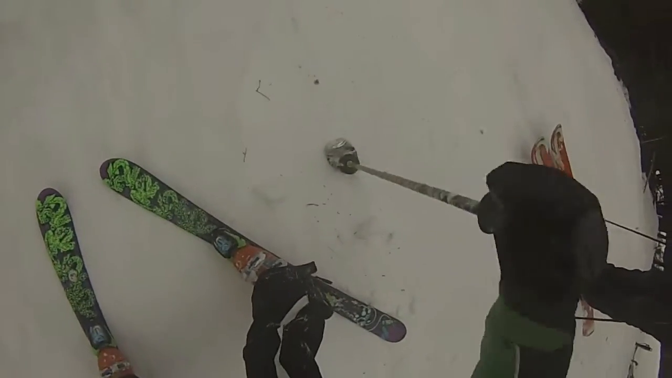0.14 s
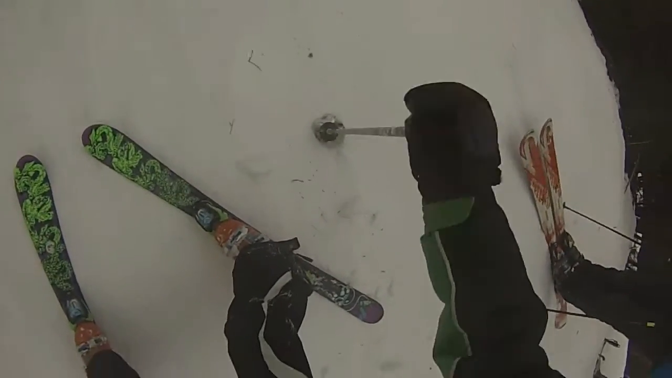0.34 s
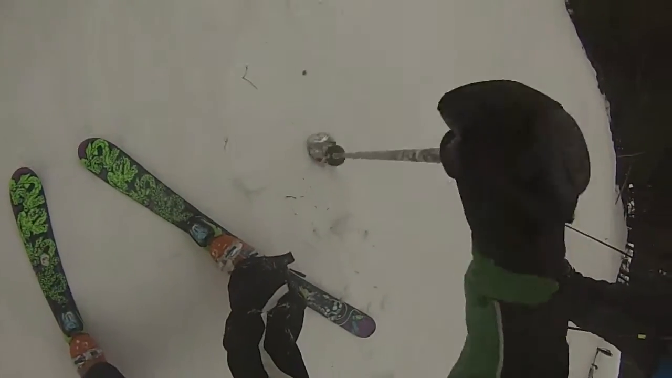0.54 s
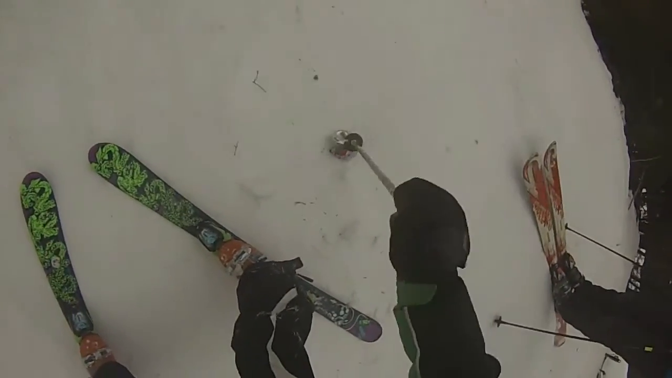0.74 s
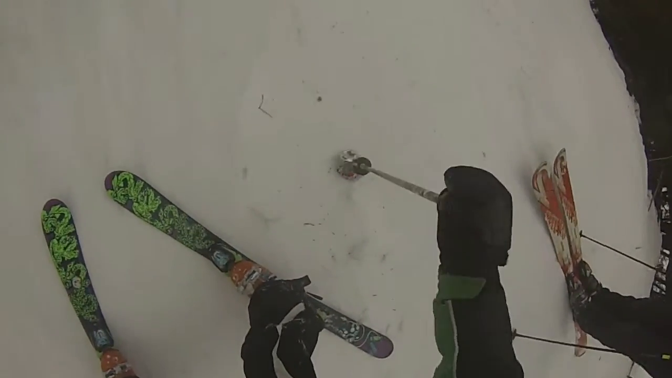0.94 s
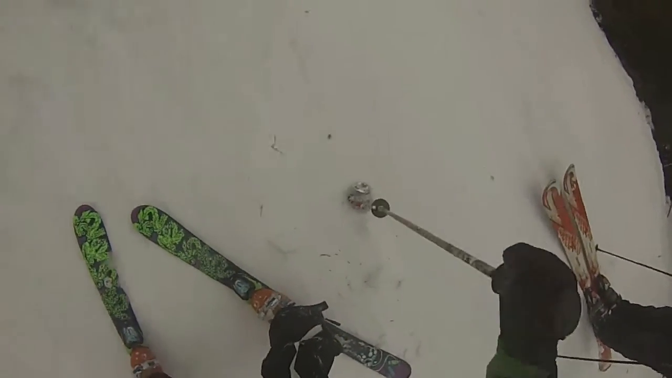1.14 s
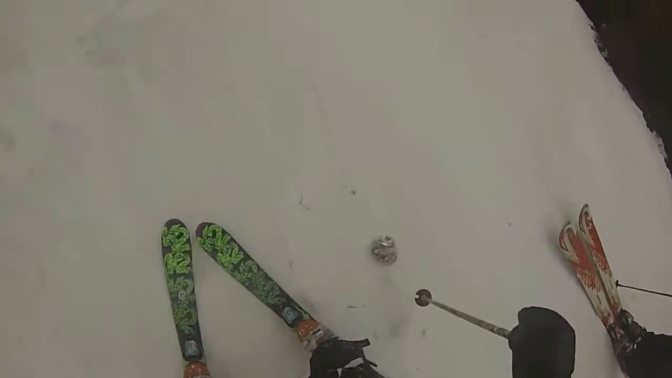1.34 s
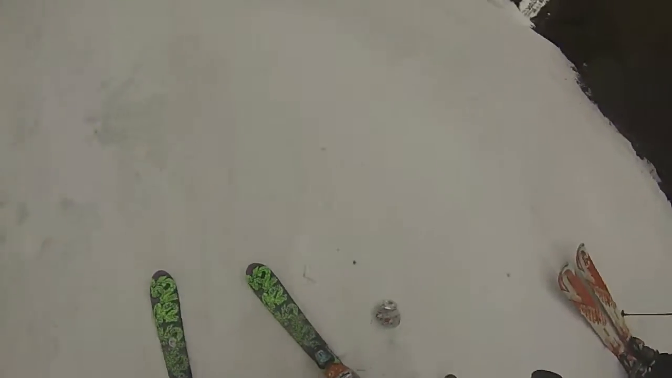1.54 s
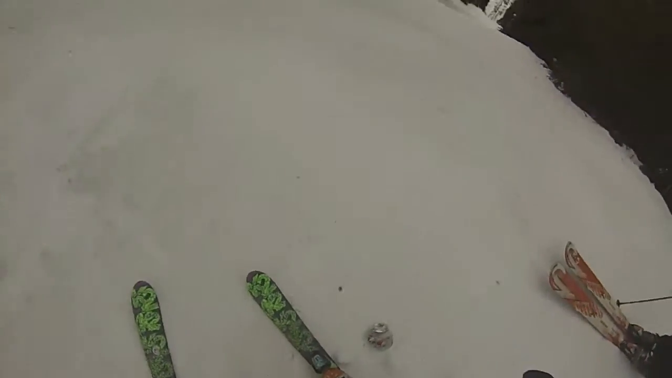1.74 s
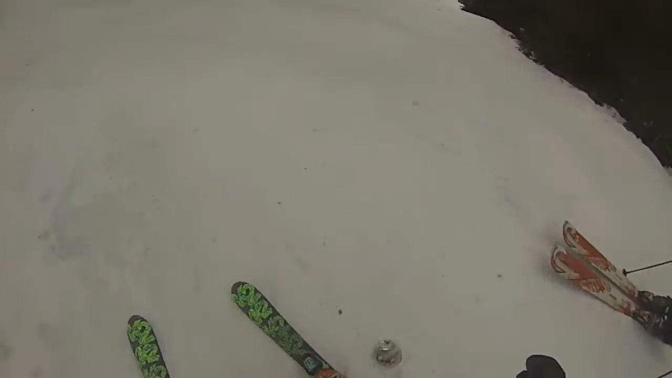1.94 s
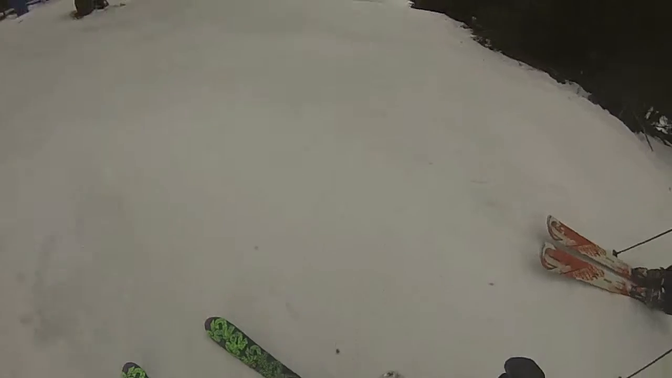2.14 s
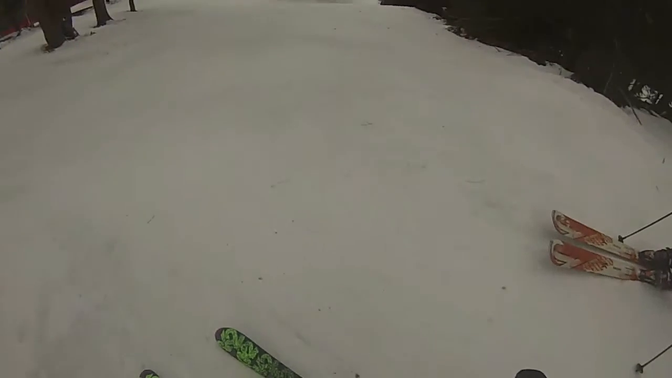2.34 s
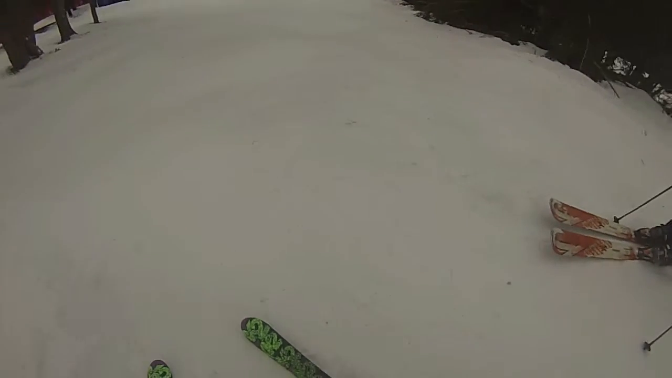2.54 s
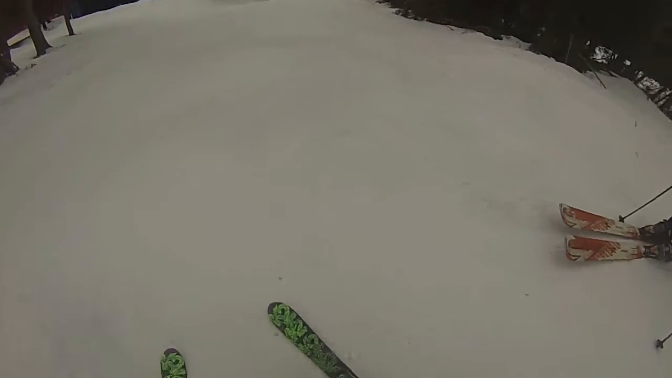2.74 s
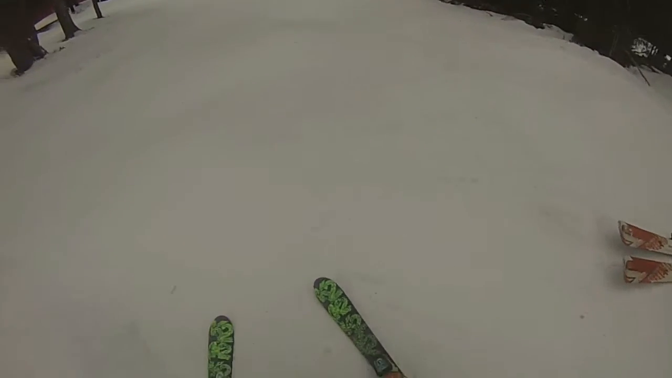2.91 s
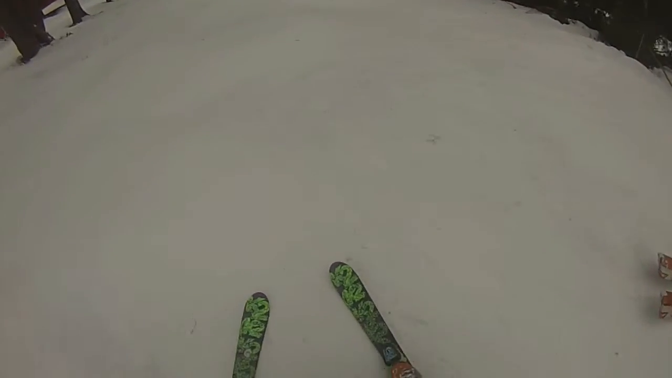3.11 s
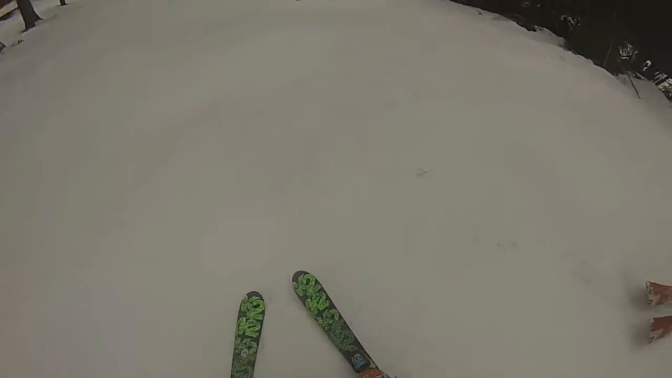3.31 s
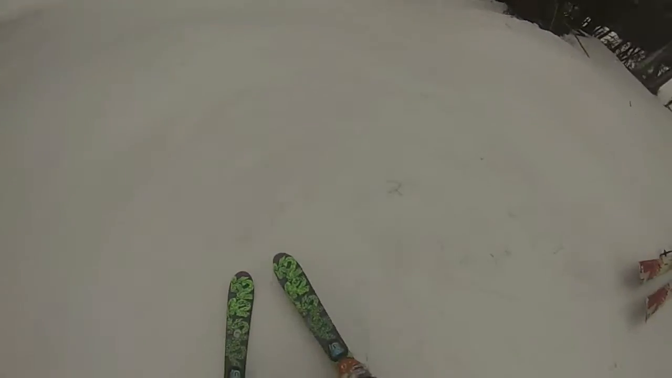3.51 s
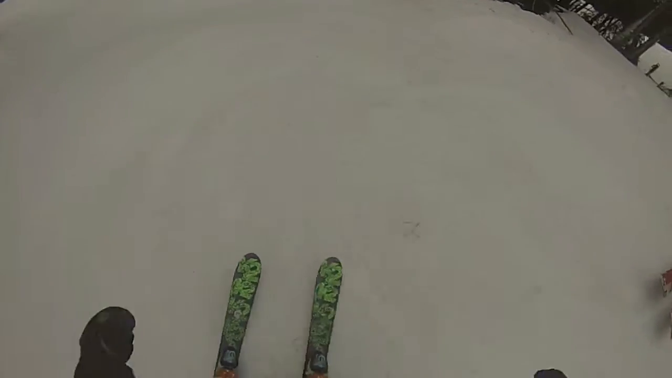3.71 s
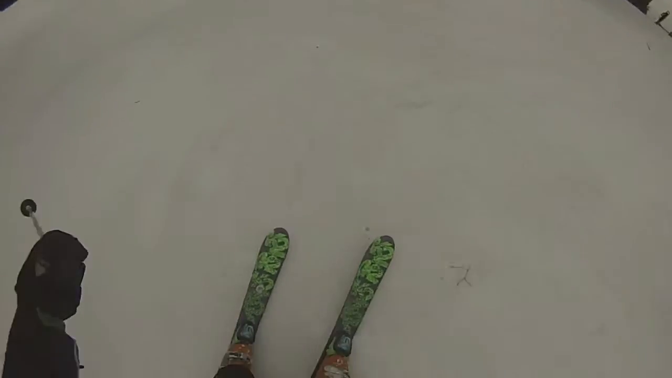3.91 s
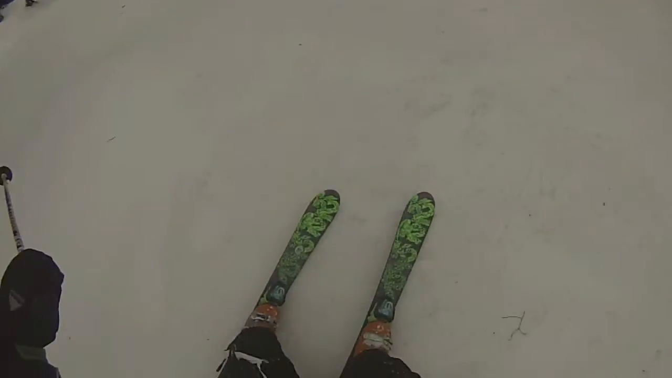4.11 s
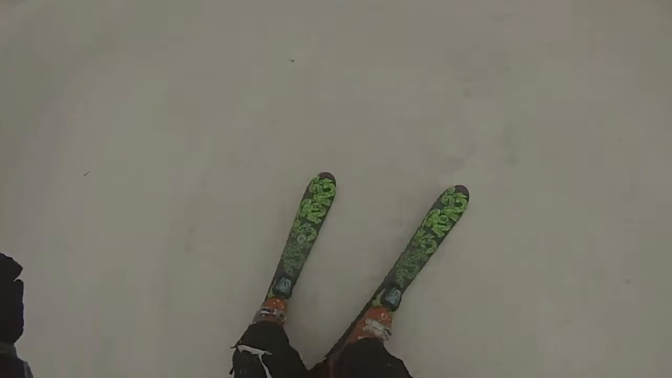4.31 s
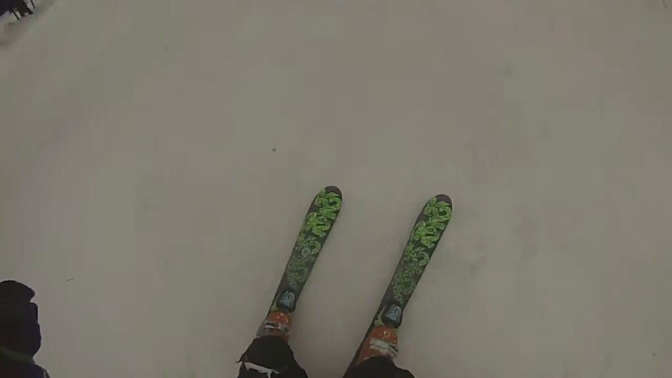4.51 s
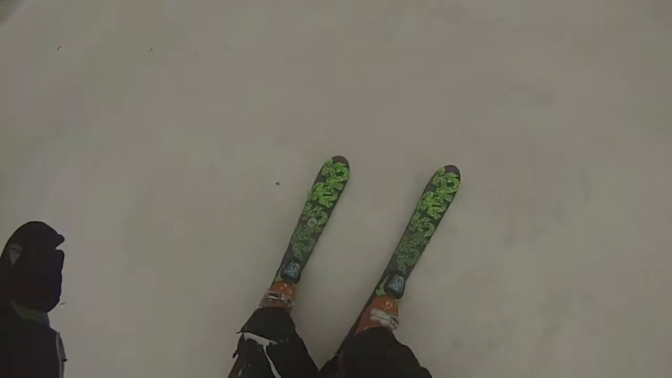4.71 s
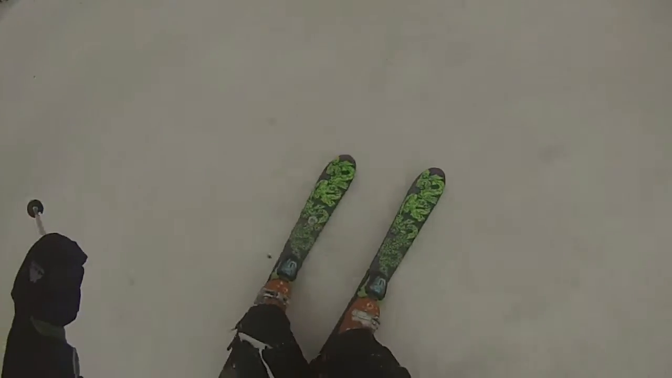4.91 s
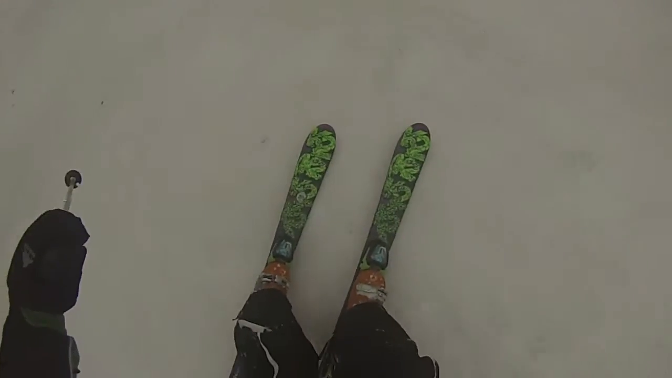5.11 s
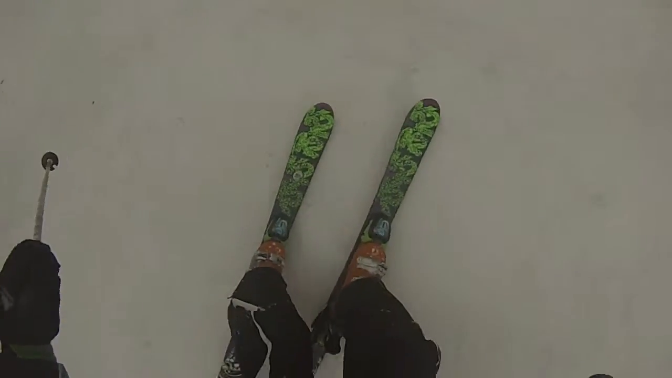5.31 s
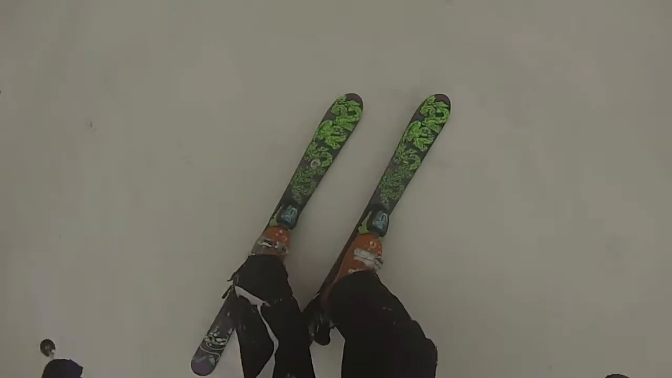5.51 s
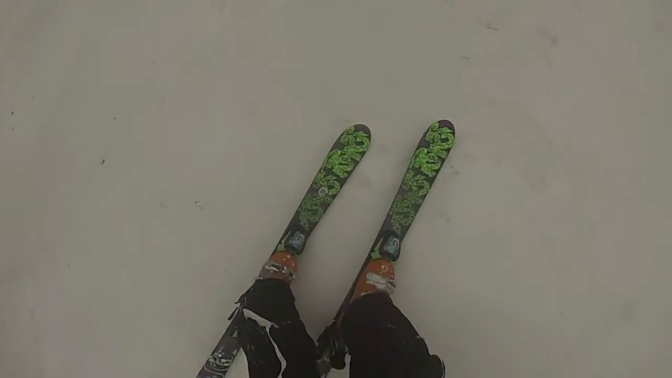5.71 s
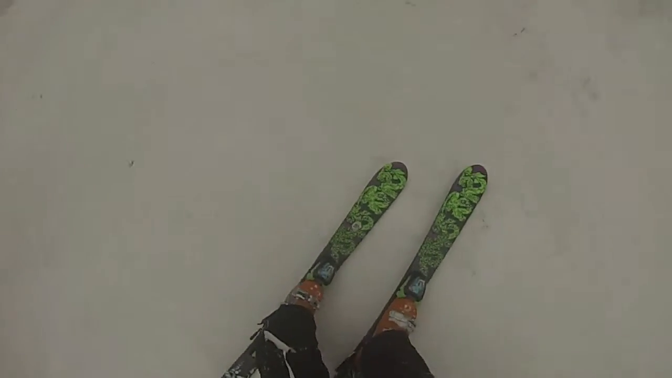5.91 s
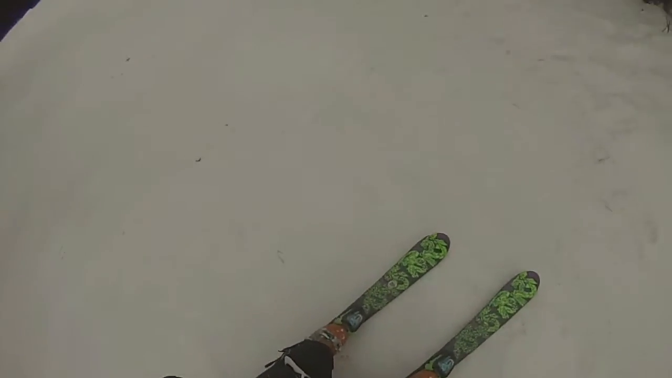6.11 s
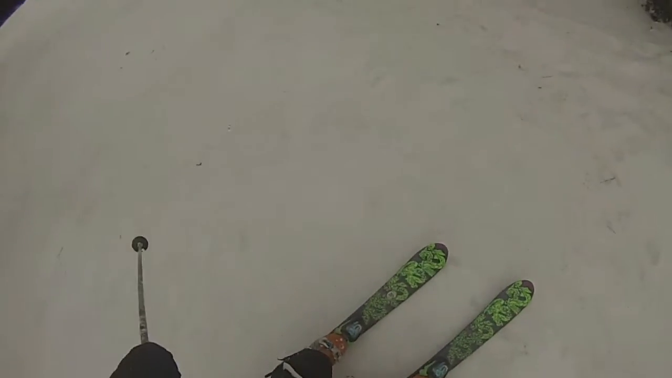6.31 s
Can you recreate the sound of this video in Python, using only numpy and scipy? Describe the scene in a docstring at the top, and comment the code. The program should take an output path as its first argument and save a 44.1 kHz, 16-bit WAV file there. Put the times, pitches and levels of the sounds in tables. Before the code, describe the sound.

A skier shuffles on crackling crust, then slides away, skis rasping and hissing over gritty ice, with dull knocks and deep wind buffeting.

```python
"""On a slope of hard icy snow a skier shuffles, then slides; the microphone rides in a sealed case on the helmet.
Breaking ice grains ring the case's resonances, and crust cracks under poles and edges as snaps with a crush.
The mount thumps on jolts as decaying sines, and pole jabs swing the case once.
Head motion and wind press on the case as deep shaped noise; a faint hoot and a steady noise floor lie behind."""
import sys
import numpy as np
from scipy import signal
from scipy.fft import rfft, irfft, next_fast_len
from scipy.io import wavfile
from scipy.ndimage import uniform_filter1d

SR = 44100
rng = np.random.default_rng(int(sys.argv[2]) if len(sys.argv) > 2 else 0)


def dump(signal):
    """Clip the signal to [-1, 1] and save it as 16-bit WAV at the path in sys.argv[1]."""
    limited = np.clip(np.atleast_2d(signal).T, -1, 1)
    pcm = np.round(limited * 32767).astype(np.int16)
    wavfile.write(sys.argv[1], SR, pcm)


N = 280035
T = np.arange(N) / SR  # seconds
SIZE = next_fast_len(N + SR // 2)  # transform length, with room for filter tails
HZ = np.arange(SIZE // 2 + 1) * SR / SIZE


def undb(db):
    """Amplitude factor of a level in dB."""
    return 10 ** (np.asarray(db) / 20)


def unit(x):
    """Scale to rms 1."""
    return x / np.sqrt(np.mean(x ** 2))


def columns(table):
    """Curve columns joined by straight lines in time."""
    seconds, *values = np.transpose(table)
    return [np.interp(T, seconds, value) for value in values]


def walk(rate):
    """Random levels held for 1 / rate seconds and slewed from one to the next; rms 1."""
    hold = max(int(SR / rate), 2)
    levels = rng.standard_normal(N // 2 + 1)[:N // hold + 1]
    steps = np.repeat(levels, hold)[:N]
    return unit(uniform_filter1d(steps, hold // 2 + 1))


def coloured(points):
    """Steady noise of rms 1 whose spectrum joins the (Hz, dB) points over log frequency."""
    hz, db = np.transpose(points)
    shape_db = np.interp(np.log(HZ + 1), np.log(hz), db, -120, -120)
    spectrum = rfft(rng.standard_normal(SIZE)) * undb(shape_db)
    return unit(irfft(spectrum, SIZE)[:N])


def ring(x, modes):
    """Causal response of steep-skirted resonances, gain 1 on white noise."""
    power = sum(undb(2 * db) / (1 + (2 * (HZ - hz) / width) ** 2) ** 3 for hz, width, db in modes)
    gain = unit(np.sqrt(power))
    cepstrum = irfft(np.log(gain), SIZE)
    cepstrum[1:SIZE // 2] *= 2  # folding the cepstrum gives minimum phase
    cepstrum[SIZE // 2 + 1:] = 0
    return irfft(rfft(x, SIZE) * np.exp(rfft(cepstrum)), SIZE)[:N]


def decay(start, t60):
    """Sudden start, then exponential fall by 60 dB in t60 seconds (at least 5 ms)."""
    age = T - start
    return (age >= 0) * np.exp(-np.log(1000) * np.clip(age, 0, 1) / max(t60, .005))


def grains(share, spread_db):
    """Ice grains snap at random, in a share of the samples, with a long tail of big ones."""
    snaps = rng.random(N) < share
    sizes = undb(spread_db * rng.exponential(size=N))
    return unit(snaps * rng.standard_normal(N) * sizes)


# Colour of the steady noise. Each row: frequency in Hz, relative density in dB per Hz.
FLOOR_COLOUR = [(150, -21), (250, -8.5), (500, -8.5), (1000, -8.5), (3000, -15.5), (8000, -28.5),
                (15000, -32)]


def noise_floor():
    """Steady coloured noise behind everything, at -61 dB rms."""
    return undb(-61) * coloured(FLOOR_COLOUR)


# A faint short hoot. Each row: time in seconds, pitch in Hz, level in dB.
HOOT_PATH = [(3.53, 471, -70), (3.57, 445, -54), (3.63, 427, -58), (3.70, 437, -53), (3.74, 458, -68)]


def hoot():
    """A lone sine whose pitch dips and rises."""
    hz, db = columns(HOOT_PATH)
    sounding = (T > HOOT_PATH[0][0]) & (T < HOOT_PATH[-1][0])
    return sounding * undb(db) * np.sin(2 * np.pi * np.cumsum(hz) / SR)


# Pressure on the case. Each row: time in seconds, rumble level in dB, throb level in dB before its wavering.
PRESSURE = [(0.0, -41, -51), (0.14, -50, -72), (0.32, -27.5, -46), (0.51, -51, -68), (0.65, -33, -59),
            (0.71, -28.5, -50), (0.87, -40.5, -60.5), (2.26, -41.5, -49.5), (2.46, -36.5, -42),
            (3.02, -47.5, -56), (3.11, -38, -31), (3.25, -42, -51), (4.19, -24.5, -34.5), (4.33, -25, -49),
            (4.54, -30.5, -43), (4.79, -19.5, -42), (4.85, -30, -53), (4.93, -34, -39), (5.06, -28, -52),
            (5.15, -26, -33), (5.32, -36.5, -45), (5.57, -31.5, -35.5), (5.94, -39, -55),
            (6.15, -39.5, -40.5), (6.24, -40, -50), (6.35, -42, -43)]
# The mount's drone. Each row: time in seconds, level in dB before the gusts.
DRONE_LEVELS = [(0, -51), (0.14, -59.5), (0.5, -57.5), (1.0, -56), (1.5, -50.5), (1.9, -61), (2.05, -46),
                (2.45, -53.5), (3.1, -46.5), (3.3, -54.5), (3.66, -47), (3.8, -51), (4.1, -39.5),
                (4.5, -52), (4.78, -44), (5.3, -49), (5.55, -41.5), (5.87, -56.5), (6.07, -48),
                (6.35, -52.5)]
# Colours of the three. Each row: frequency in Hz, relative density in dB per Hz.
RUMBLE_COLOUR = [(6, -15), (12, 7.5), (24, 1), (36, -10.5), (60, -46)]
THROB_COLOUR = [(22, -20), (36, -8), (60, -1), (85, -14.5), (130, -49)]
DRONE_COLOUR = [(55, -27), (90, -4), (130, -0.5), (160, -12.5), (200, -19), (300, -24), (420, -81),
                (600, -46)]


def buffet():
    """Head motion and wind on the case: deep pressure swings, a faster throb and the mount's gusty drone."""
    rumble_db, throb_db = columns(PRESSURE)
    drone_db, = columns(DRONE_LEVELS)
    rumble = coloured(RUMBLE_COLOUR) * undb(rumble_db)
    throb = coloured(THROB_COLOUR) * undb(throb_db + 2.0 * walk(8.))
    drone = coloured(DRONE_COLOUR) * undb(drone_db + 3.1 * walk(18.0))
    return rumble + throb + drone


# Thumps of the mount. Each row: time in seconds (the thump starts 3 ms after it), nominal level in dB,
# overtones against it in dB before a fixed trim, t60 of the lowest mode in seconds.
MOUNT_THUMPS = [(0.337, -32, -23, 0.071), (0.741, -32, -12.5, 0.067), (1.375, -35.5, -14, 0.039),
                (1.757, -28.5, -16, 0.059), (2.657, -41.5, -30, 0.06), (2.73, -39, -15, 0.039),
                (2.853, -42.5, -31, 0.15), (3.431, -27.5, -16, 0.062), (3.583, -33, -4, 0.046),
                (3.694, -37, -9, 0.051), (3.843, -29.5, -19, 0.079), (6.083, -32.5, -18, 0.031)]
# Overtones of the mount. Each row: frequency in Hz, relative level in dB.
MOUNT_OVERTONES = [(230, -4), (380, -3.5)]
MOUNT_HZ = 139.8  # lowest mode


def thumps():
    """The mount rings briefly on each jolt, sharper ones waking its overtones; high modes die sooner."""
    out = np.zeros(N)
    for listed, db, sharp_db, t60 in MOUNT_THUMPS:
        start = listed + 0.003  # each thump starts 3 ms after its listed time
        rise = -np.clip((T - start) / 0.0024, 0, 1)  # the first swing is inward
        modes = [(MOUNT_HZ, 6.0)]
        modes += [(hz, over_db + sharp_db + 11.5) for hz, over_db in MOUNT_OVERTONES]
        for hz, mode_db in modes:
            envelope = rise * decay(start, t60 * MOUNT_HZ / hz)
            out += undb(db + mode_db) * envelope * np.sin(2 * np.pi * hz * (T - start))
    return out


# Pole jabs that shake the head. Each row: start in seconds, nominal level in dB, length of the swing in seconds.
POLE_JABS = [(0.293, -33, 0.052), (0.7, -18.5, 0.048), (3.879, -21.5, 0.067)]


def jabs():
    """Each pole jab swings the case out and back once."""
    out = np.zeros(N)
    for start, db, period in POLE_JABS:
        turn = np.clip((T - start) / period, 0, 1) ** 0.71  # the swing back is slower
        out += undb(db) * np.sin(2 * np.pi * turn) * np.sin(np.pi * turn) ** 0.15
    return out


# Crust cracks. Each row: start in seconds, nominal level in dB, then upper ring, treble and body against it
# in dB before a fixed trim of each, t60 of the crush in seconds.
CRUST_CRACKS = [(0.032, -29.5, -22, -21, -11.5, 0.044), (0.0871, -25, -25, -21, -15, 0.023),
                (0.2716, -18.5, -15.5, -12, -13.5, 0.065), (0.3344, -37, -12, -18, -11, 0.15),
                (0.395, -28, -15, -21, -14, 0.022), (0.4755, -32.5, -28, -34, -15, 0.035),
                (0.486, -29, -9, -20, -24, 0.016), (0.502, -38, -8, -7, -22, 0.021),
                (0.5127, -29, -22, -24, -26, 0.039), (0.5863, -32, -13, -17, -6, 0.017),
                (0.6584, -36, -20, -14, -11, 0.036), (0.67, -36.5, -7, -2, -3, 0.061),
                (0.681, -18.5, -14.5, -6.5, -13, 0.064), (0.7007, -33, -8, 1, -23, 0.035),
                (0.713, -35, -16, -5, -12, 0.13), (0.754, -39, -11, -2, -8, 0.052),
                (0.8015, -30, -20, -31, -11, 0.014), (0.8587, -31.5, -23, -18, -21, 0.037),
                (0.8949, -31, -10, -21, -8, 0.019), (0.9365, -36.5, -13, -11, -13, 0.039),
                (1.5807, -22.5, 0, -31, -36, 0.09), (1.6447, -18.5, -11, -18, -27, 0.12),
                (1.807, -29.5, -2, -8, -30, 0.064), (1.844, -24.5, -1, -8, -28, 0.029),
                (1.8761, -24, -5, -9.5, -26, 0.04), (1.9839, -20, -14, -40, -30, 0.013),
                (2.0558, -24, -14, -16, -14, 0.039), (2.19, -23.5, -12, -13, -14, 0.078),
                (2.2752, -27, -2, -23, -16, 0.027), (3.126, -17.5, -19, -21, -33, 0.04),
                (3.3546, -17.5, -23, -29, -34, 0.049), (3.474, -29, -8, -19, -19, 0.11),
                (3.74, -34, -14, -19, -26, 0.04), (3.854, -21.5, -1.5, -19, -25, 0.057),
                (5.175, -18.5, -5, -18, -29, 0.036), (5.8512, -41, -15, 1.5, -28, 0.035),
                (6.1615, -21.5, -11, -8, -28, 0.03), (6.289, -36, -15, -12, -30, 0.034)]
# Height of the first snap in one row: ring, upper ring, treble and body in dB against the crush.
SNAP_LEVELS = (12.5, 12, 6, 9.1)


def cracks():
    """Each crack is a one-sample snap and a short crush of grains, in ring, upper ring, treble and body."""
    crush = grains(share=.3, spread_db=1.5)
    out = np.zeros((4, N))
    for start, db, upper_db, treble_db, body_db, t60 in CRUST_CRACKS:
        burst = np.tile(crush * decay(start, t60), (4, 1))
        burst[:, int(start * SR)] += undb(SNAP_LEVELS)
        trimmed_db = np.array([-9.0, upper_db + 0.5, treble_db - 9.5, body_db - 5.0])
        out += undb(db + trimmed_db)[:, None] * burst
    return out


# Ski strokes. Each row: touch in seconds, lift in seconds, rise in dB per second, fall in dB per second,
# ring at touch in dB and at lift in dB, then upper ring, rasp, steel edge, ice hiss and ski body
# against the ring in dB; all before the surges.
SKI_STROKES = [(0.0, 0.095, 900, 150, -52, -62.5, -5.5, -14, -24, -20, -20),
               (0.386, 1.175, 150, 295, -61, -51, -5.5, -12.5, -17.5, -21, -22),
               (1.245, 1.688, 177, 453, -46, -34, -1.5, -14.5, -15.5, -18, -18.5),
               (1.697, 2.175, 300, 300, -48, -46, 0, -12.5, -15.5, -18, -14),
               (1.821, 1.91, 500, 300, -40.5, -41.5, 2, -11, -12.5, -15, -12.5),
               (2.171, 2.604, 700, 354, -41, -34, 1, -13.5, -9, -17, -13),
               (2.669, 2.893, 300, 100, -48.5, -48, 2.5, -10, -10.5, -16, -13.5),
               (2.891, 3.2, 121, 60, -41, -40.5, -2.5, -8.5, -19, -20, -12.5),
               (3.25, 3.486, 60, 200, -40, -40, -4, -11.5, -17.5, -21.5, -16),
               (3.504, 3.8, 100, 300, -47.5, -51, -3, -9.5, -11, -13, -11.5),
               (3.833, 3.994, 500, 100, -35.5, -37, 0, -18, -11.5, -16, -18),
               (4.002, 4.606, 82, 80, -29.5, -28.5, 1, -6.5, -10, -14.5, -15),
               (4.703, 5.08, 60.3, 60.5, -30.5, -27.5, -1, -8, -10.5, -14.5, -16.5),
               (5.203, 5.753, 60, 250, -31, -31.5, -0.5, -9.5, -12, -16.5, -17.5),
               (5.76, 5.818, 300, 695, -35.5, -39.5, 0.5, -7.5, -14, -17, -16),
               (5.927, 5.953, 2940, 1980, -41, -43.5, -0.5, -6, -9, -19, -11),
               (5.985, 6.35, 3000, 300, -45.5, -42, 1, -7.5, -9.5, -14.5, -16.5)]
# The edge bites harder or eases off. Each row: centre in seconds, change in dB before the shares below,
# extra in the upper ring in dB, extra in the treble in dB, half width at 1/e in seconds.
EDGE_SURGES = [(1.4, -3.5, -2, 1, 0.064), (1.635, 11, 4, -1.5, 0.038), (1.85, 2.5, 1, -0.5, 0.026),
               (2.0, 1.5, -2, 0, 0.018), (2.07, 1, -8, 0.5, .03), (2.4, 2, 0, 0, 0.064),
               (2.56, 1, 3, 1, 0.029), (3.05, 4.5, 1, 0.5, 0.047), (3.17, -1.5, 0.5, 5.5, 0.062),
               (3.359, -2, -1, 0, 0.025), (4.04, 0.5, -0.5, 1, 0.086), (4.16, 3.5, 3, -1, 0.1),
               (4.41, -4, 0, -1, 0.027), (4.48, 5.5, 1.5, -0.5, 0.038), (4.56, 8, 1.5, -1, 0.023),
               (4.65, -3, -3, 0, 0.036), (4.87, 2.5, -6.5, -5, 0.013), (4.941, 6.5, 5, -1, 0.084),
               (5.08, -4, 0.5, 1, 0.016), (5.27, 2, 4, -1.5, .06), (5.5, 5, -1.5, 0.5, 0.23),
               (5.66, 2.5, 2, 2.5, 0.033), (6.09, 2, 1.5, 2.5, 0.024), (6.23, 2, 1, -0.5, 0.021)]
# How far each layer follows a surge, as a fraction, in one row: ring, upper ring, rasp, edge, hiss and body.
FOLLOW_SHARES = (0.77, 0.59, 0.72, 0.67, 0.71, 0.72)


def slide():
    """Layer levels in dB: strokes touch, drift and lift, and their powers add; surges ride on top."""
    power = np.zeros((6, N))
    for touch, lift, rise, fall, touch_db, lift_db, *colour_db in SKI_STROKES:
        db = np.interp(T, [touch, lift], [touch_db, lift_db])
        db -= rise * np.clip(touch - T, 0, None)
        db -= fall * np.clip(T - lift, 0, None)
        power += undb(2 * db) * undb(2 * np.array([0, *colour_db]))[:, None]
    levels_db = 10 * np.log10(power + 1e-12)
    for centre, db, upper_db, treble_db, half in EDGE_SURGES:
        bump = np.exp(-((T - centre) / half) ** 2)
        levels_db += np.outer(FOLLOW_SHARES, db * bump)
        levels_db[1] += upper_db * bump
        levels_db[2:5] += treble_db * bump
    return levels_db


# Resonances heard inside the sealed case, by layer. Each row: frequency in Hz, width in Hz, relative level in dB.
RING_MODES = [(1304, 173, -5), (1375, 196, 3), (1546, 280, 1), (1582, 293, -1)]
UPPER_MODES = [(1885, 80, 5), (1975, 354, 7.5), (2233, 810, -2), (2434, 218, 1.5)]
RASP_MODES = [(2835, 260, -4.5), (3235, 470, -2), (3637, 630, 3)]
EDGE_MODES = [(4295, 530, 0.5), (4657, 550, 2.5), (4860, 660, 2), (5203, 330, 1.5)]
HISS_MODES = [(5615, 770, 0.5), (6450, 820, 1), (7100, 1500, -1.5), (8430, 2060, -10.5),
              (10670, 1850, -15.5), (12000, 1600, -20), (14000, 1500, -28)]
BODY_MODES = [(526, 590, 0), (682, 99, 4), (830, 810, -1), (1000, 140, 9)]


def skis():
    """Coarse grit rings the low resonances, fine spray the high ones; the edge chatters on the ice."""
    levels_db = slide()
    chatter = walk(50.)
    # a quiet ski breaks few grains, a loud one many
    busy = np.interp(levels_db[0], [-58, -40], [.03, .25])

    def coarse():
        return unit(grains(share=busy, spread_db=2.0) * undb(1.06 * chatter) / np.sqrt(busy))

    def fine():
        return unit(grains(share=2 * busy, spread_db=2.5) * undb(0.86 * chatter) / np.sqrt(busy))

    grit, flex = coarse(), coarse()
    spray, shave, dust = fine(), fine(), fine()
    low, upper, treble, body = cracks()
    layers = [  # resonances, rubbing grains, cracks
        (RING_MODES, grit, low),
        (UPPER_MODES, grit, upper),
        (RASP_MODES, 0.5 * grit + 0.8 * spray, treble),
        (EDGE_MODES, shave, treble * undb(-5.5)),
        (HISS_MODES, dust, treble * undb(-6.5)),
        (BODY_MODES, flex, body),
    ]
    near = np.zeros(N)
    for (modes, rub, hit), db in zip(layers, levels_db):
        waver_db = 1.0 * walk(40.)  # each part of the case wavers a little on its own
        near += ring(rub * undb(db + waver_db) + hit, modes)
    # a bounce off body and slope arrives with a drifting lag, so the colour shifts as the head moves
    lag = 0.00123 + 0.00021 * uniform_filter1d(walk(2.5), SR // 5)  # seconds
    return near + 0.17 * np.interp(T - lag, T, near)


def scene():
    """All that reaches the helmet microphone, in one channel."""
    background = noise_floor() + hoot() + buffet()
    return (background + thumps() + jabs() + skis())[None]


def record(dry):
    """The recorder cuts the top above 15220 Hz; the last 4 ms fade."""
    faded = dry * np.clip((T[-1] - T) / .004, 0, 1)
    top_cut = signal.ellip(10, .2, 70, 15220, fs=SR, output="sos")
    return signal.sosfilt(top_cut, faded)


dry = scene()
out = record(dry)
dump(out)
```